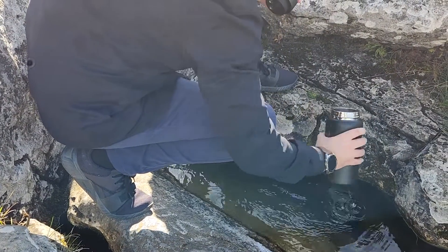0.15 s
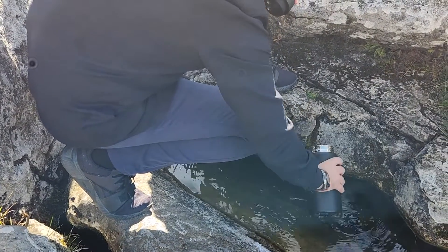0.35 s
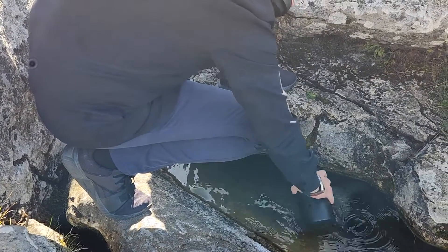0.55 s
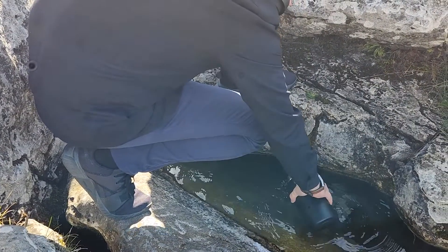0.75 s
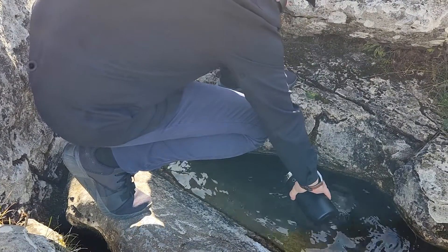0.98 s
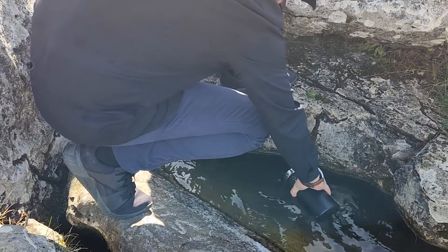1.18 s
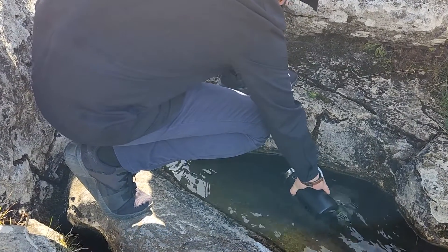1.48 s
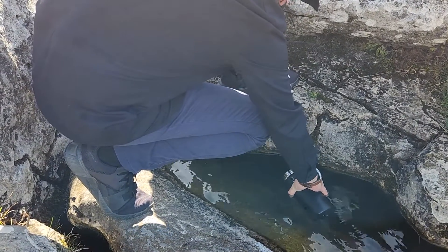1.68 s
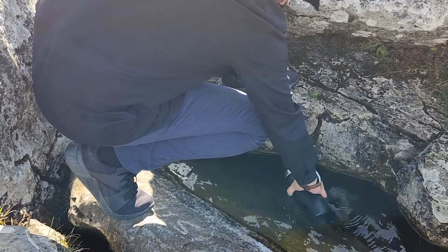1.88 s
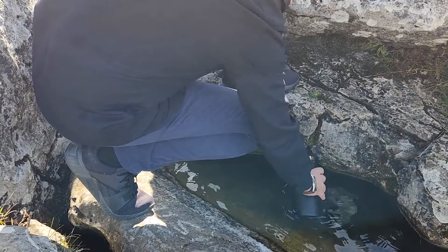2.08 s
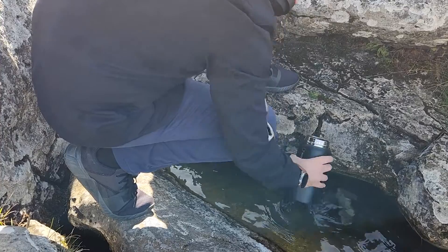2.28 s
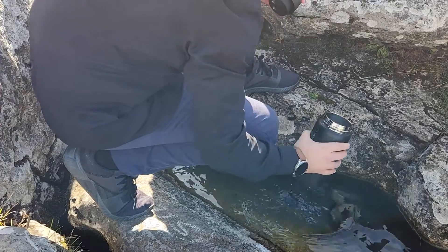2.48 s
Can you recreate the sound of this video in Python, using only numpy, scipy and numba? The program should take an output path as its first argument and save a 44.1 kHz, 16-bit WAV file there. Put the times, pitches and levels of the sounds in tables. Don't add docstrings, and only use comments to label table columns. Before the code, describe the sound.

Water plinks and bubbles as a steel bottle dips into a rock pool and lifts out dripping

```python
import sys
import numpy as np
from scipy import signal
from scipy.fft import rfft, irfft
from scipy.io import wavfile
from scipy.ndimage import uniform_filter1d
from numba import njit

SR = 44100
rng = np.random.default_rng(int(sys.argv[2]) if len(sys.argv) > 2 else 0)


def wav_out(sig):
    wavfile.write(sys.argv[1], SR, np.round(np.clip(np.atleast_2d(sig).T, -1, 1) * 32767).astype(np.int16))


def how_loud(loudness_db):
    steps = np.asarray(loudness_db, float) / 20
    return 10 ** steps


N = 116865


def level(x, db):
    return x * how_loud(db) / np.sqrt(np.mean(x ** 2))


def curve(rows, axis):
    rows = np.array(rows, float)
    return np.interp(np.arange(N) / SR, rows[:, 0], rows[:, axis])


def coloured(points):
    hz, db = np.array(points, float).T
    f = np.maximum(np.arange(N // 2 + 1) * SR / N, 1)
    gain = how_loud(np.interp(np.log(f), np.log(hz), db))
    in_band = (f >= hz[0]) * (f <= hz[-1])
    return irfft(rfft(rng.standard_normal(N)) * gain * in_band, N)


def walk(rate):
    hold = int(SR / rate)
    steps = np.repeat(rng.standard_normal(N // hold + 1), hold)
    return 0.82 * uniform_filter1d(uniform_filter1d(steps, hold), hold)[:N]


def wind():
    # (frequency [Hz], density [dB])
    wind_bands = [(20, -12.5), (64, 0.5), (150, -16), (400, -29), (730, -35), (1200, -42)]
    gusts = how_loud(2.4 * walk(2.2) + 1.0 * walk(14.42))
    return level(coloured(wind_bands), -52) * gusts


def leaves():
    # (frequency [Hz], density [dB])
    leaf_bands = [(1200, -6), (2400, -11), (3500, -2), (6800, 0), (7600, -8), (9800, -4), (10800, -18),
                  (15800, -25)]
    # (time [s], level [dB])
    breeze = [(0, -8), (.9, -2.5), (1.3, 0), (1.7, -8.5), (2.65, 4.5)]
    hiss = level(coloured(leaf_bands), -65) * how_loud(walk(12))
    top = signal.sosfiltfilt(signal.butter(1, 3500, "high", fs=SR, output="sos"), hiss)
    return hiss + (how_loud(curve(breeze, axis=1)) - 1) * top


def grass():
    # (frequency [Hz], density [dB])
    grass_bands = [(7500, -10), (11000, 13.5), (15800, 18)]
    # (time [s], level [dB])
    grass_level = [(0, -88), (.35, -76), (.55, -84), (2.65, -80)]
    return level(coloured(grass_bands), 0) * how_loud(curve(grass_level, axis=1) + walk(9))


@njit
def ring(rows, rise, share, choke, wobble, sr):
    n = len(wobble)
    out = np.zeros(n)
    for s, size, hz, t60, glide in rows:
        start, phase, tau = s * sr, 0., share * t60
        for i in range(int(start) + 1, min(n, int(start + t60 * sr))):
            t = (i - start) / sr
            shake = wobble[int(start + t * hz * 4) % n]
            octaves = glide * tau * (1 - np.exp(-t / tau))
            pitch = min(hz * 2 ** octaves, sr / 2.3)
            phase += shake ** .06 * 2 * np.pi * pitch / sr
            swell = (1 - np.exp(-t * hz / rise)) ** 2
            decay = 1000 ** -(t / t60) ** choke
            out[i] += size * shake * swell * decay * np.sin(phase)
    return out


def bubbles(rows, rise_cycles=0.83, wobble_db=5.5):
    glide_share = 0.327
    choke = 1.147
    rows = np.array(rows, float)
    rows[:, 1] = how_loud(rows[:, 1])
    rows[:, 3] = np.maximum(rows[:, 3], .002)
    roughness = how_loud(wobble_db * walk(2000))
    return ring(rows, rise_cycles, glide_share, choke, roughness, 1. * SR)


def earlier_drip():
    # (time [s], peak level [dB], pitch [Hz], ring t60 [s], glide [octaves/s])
    drip = [
        (0.0033, -64.5, 637, 0.47, 0.017),
    ]
    return bubbles(drip)


def dip_bubbles():
    # (time [s], peak level [dB], pitch [Hz], ring t60 [s], glide [octaves/s])
    dip_rows = [(0.2825, -44, 4350, 0.022, -7), (0.285, -48.5, 5050, 0.031, -8),
                (0.283, -46, 6850, 0.011, 4), (0.32, -50, 6700, 0.027, 9), (0.34, -53.5, 3180, 0.035, -9),
                (0.373, -58, 6730, .015, 3), (0.432, -47, 5740, 0.011, 1),
                (0.457, -26.5, 5120, 0.026, -0.5), (0.462, -28, 4920, 0.012, 14),
                (0.4672, -21.5, 1810, 0.014, -20), (0.471, -35.5, 1606, 0.063, -7),
                (0.473, -43, 1950, 0.045, 1), (0.487, -35.5, 1492, 0.028, -8),
                (0.534, -53.5, 1725, 0.09, 1), (0.488, -47, 4170, 0.017, 3), (0.587, -56, 2730, 0.14, -1),
                (0.588, -59, 3170, 0.12, -1.5), (0.586, -45, 966, 0.16, -6), (0.59, -61.5, 606, 0.14, -1),
                (0.629, -49, 4750, 0.038, -4), (0.633, -55.5, 1990, 0.17, -2),
                (0.716, -42, 1410, 0.042, 25), (0.718, -48, 4010, .04, -11), (0.721, -50, 1920, 0.077, 1),
                (0.796, -48.5, 3870, 0.032, 5), (0.852, -52, 1850, 0.076, 10), (0.735, -48, 1810, 0.072, 2),
                (0.773, -52.5, 1770, 0.068, 3), (0.797, -48.5, 1494, 0.088, -0.5),
                (0.836, -31, 1245, 0.057, 6.5), (0.838, -29.5, 1850, 0.021, -6),
                (0.836, -46.5, 2500, 0.042, -2), (0.86, -47.5, 1277, 0.16, 2.5),
                (0.996, -58, 1850, 0.033, -11), (1.918, -51, 6580, 0.07, -3)]
    return bubbles(dip_rows)


def splats(count=30):
    # (time [s], peak level [dB], size [octaves over 1 kHz], tail t60 [s])
    dip_drops = [(0.2817, -39.5, 2.63, .04), (0.322, -46.5, 2.78, 0.06), (0.347, -44.5, 3.6, 0.027),
                 (.457, -32, 2.71, 0.058), (0.466, -37, 1.73, 0.046), (.535, -31, 2.52, 0.05),
                 (0.66, -41, 2.06, 0.05), (0.717, -42.5, 1.76, 0.16), (0.796, -44, 2.58, 0.18),
                 (0.835, -41, 2.69, 0.054), (1.739, -54.5, 2.64, .04), (1.859, -52, 2.03, 0.05),
                 (1.918, -43.5, 3.18, 0.052), (1.973, -31, 2.27, 0.052), (2.03, -38.5, 1.57, 0.04),
                 (2.033, -33, 2.6, 0.14), (2.12, -49, 1.6, 0.023), (2.267, -54, 3, .02),
                 (0.2826, -37, 3.9, .015), (0.373, -52.5, 2.87, 0.031)]
    # (time [s], peak level [dB], size [octaves over 1 kHz])
    lift_drops = [(2.337, -43.5, 1.75), (2.354, -45, 2.92), (2.371, -34.5, 2.54), (2.418, -34, 2.71),
                  (2.447, -30.5, 2.33), (2.462, -34.5, 2.57), (2.488, -28, 2.3), (2.500, -25, 3),
                  (2.505, -28, 1.58), (2.516, -28.5, 2.6), (2.536, -28, 2.53), (2.554, -31.5, 3.06),
                  (2.567, -31, 2.7), (2.577, -32.5, 2.5), (2.591, -44, 4.5), (2.639, -49, 2.9)]
    lift_t60_s = .05
    spray_oct, spray_cycles, spray_db = 0.362, 14.5, -2
    mist_db, crack_db, crack_s = -3, -11, 0.00092
    out, spray, t = np.zeros(N), [], np.arange(SR // 5) / SR
    for s, db, octs, t60 in dip_drops + [(*row, lift_t60_s) for row in lift_drops]:
        hz, t60 = 1000 * 2 ** octs, max(t60, .004)
        chance, spread = rng.random((count, 2)), rng.standard_normal((count, 2))
        pitch = np.clip(hz * 2 ** (spray_oct * spread[:, 0]), 1200, 14500)
        late = t60 * .5 * chance[:, 0] ** 1.5
        spray_level = db + spray_db + 3 * spread[:, 1] - 60 * late / t60
        spray_t60 = spray_cycles * (1 + chance[:, 1]) / pitch
        spray += list(np.c_[s + late, spray_level, pitch, spray_t60, 0 * pitch])

        noise = rng.standard_normal(len(t))
        mist = noise * how_loud(mist_db - 60 * t / t60) * (1 - np.exp(-t / 0.0013))
        edges = np.clip([hz * 0.59, hz * 1.48], 300, 16000)
        mist = signal.sosfilt(signal.butter(3, edges, "band", fs=SR, output="sos"), mist)
        crack = noise * how_loud(crack_db) * np.exp(-t / crack_s)
        crack = signal.sosfilt(signal.butter(2, edges[0], "high", fs=SR, output="sos"), crack)
        i = int(s * SR)
        out[i:i + len(t)] += how_loud(db) * (mist + crack)[:N - i]
    return out + bubbles(spray)


def running_water(flow, count):
    centre_hz, spread_oct, ring_cycles, spread_db = 1902, 0.97, 12.5, 2.5
    fizz_tilt = 0.025
    chance, spread = rng.random(count), rng.standard_normal(count)
    excess = rng.exponential(size=count)
    s = flow[0][0] + chance * (flow[-1][0] - flow[0][0])
    db = np.interp(s, *np.array(flow).T)
    hz = np.clip(centre_hz * 2 ** (fizz_tilt * (db - db.mean()) + spread_oct * spread), 750, 14000)
    peak_db = db + spread_db * np.minimum(excess, 2)
    return bubbles(np.c_[s, peak_db, hz, ring_cycles / hz, 0 * s + 10])


def trickle():
    # (time [s], level [dB])
    inflow = [
        (.46, -61),
        (.92, -62),
    ]
    return running_water(inflow, count=250)


def pocket(rows):
    t = np.arange(N) / SR
    pitch = curve(rows, axis=1) * (1 + 0.0055 * walk(59.66))
    tone = np.sin(2 * np.pi * np.cumsum(pitch) / SR)
    sounding = uniform_filter1d(1. * (t > rows[0][0]) * (t < rows[-1][0]), size=150)
    return np.sqrt(2) * how_loud(curve(rows, axis=2) + 3.5 * walk(70)) * tone * sounding


def neck_pocket():
    # (time [s], pitch [Hz], level [dB])
    neck = [(.584, 1446, -70), (.589, 1414, -42.5), (.615, 1359, -42), (.715, 1342, -63)]
    return pocket(neck)


def slosh():
    # (frequency [Hz], width [Hz], level [dB])
    slosh_modes = [(850, 130, -11.5), (1150, 170, -12.5), (1439, 81, -13), (1850, 160, -14.5)]
    # (time [s], level [dB])
    slosh_level = [(1.96, -69.5), (2.0, -55.5), (2.18, -61), (2.3, -58), (2.65, -55)]
    murmur = np.zeros(N)
    for hz, width, db in slosh_modes:
        mode = signal.lfilter(*signal.iirpeak(hz, hz / width, fs=SR), rng.standard_normal(N))
        murmur += level(mode, db) * how_loud(2.2 * walk(24.87))
    return murmur * how_loud(curve(slosh_level, axis=1))


def belly_pocket():
    # (time [s], pitch [Hz], level [dB])
    belly = [(1.972, 423.7, -46), (1.98, 413.6, -42.5), (2.03, 382, -50), (2.1, 355.5, -53.5),
             (2.165, 385, -57.5), (2.18, 376, -62), (2.26, 443, -66.5)]
    return pocket(belly)


def gulps():
    # (time [s], level [dB])
    knocks = [
        (1.9723, -27.5),
        (2.028, -34.5),
    ]
    # (frequency [Hz], level [dB], t60 [s], glide [octaves/s])
    knock_modes = [
        [(657, 2, 0.095, 0.5), (980, -7, 0.13, -6), (1120, -19, 0.43, 1), (1410, 4.5, 0.042, 6.5),
         (1594, -18, .15, -1), (2564, -10, 0.049, -1.5), (2956, -6, 0.021, -6)],
        [(616, -3.5, 0.13, -0.78), (818, -17, 0.23, 0.047), (985, -2, 0.069, 0), (1156, -3, 0.13, -1.74),
         (1304, -1, 0.075, -1.4), (1563, -8.5, 0.13, 0.092), (1850, -2.5, 0.04, 0)],
    ]
    rows = []
    for (s, db), modes in zip(knocks, knock_modes):
        rows += [(s, db + mode_db, hz, t60, glide) for hz, mode_db, t60, glide in modes]
    return bubbles(rows, rise_cycles=1.46, wobble_db=1.6)


def streaming():
    # (time [s], level [dB])
    outflow = [(2.31, -69), (2.36, -50), (2.44, -47.5), (2.5, -43.5), (2.58, -52), (2.6, -72)]
    return running_water(outflow, count=600)


def lift_bubbles():
    # (time [s], peak level [dB], pitch [Hz], ring t60 [s], glide [octaves/s])
    lift_rows = [(2.343, -32.5, 3010, 0.035, 3), (2.346, -38, 3270, 0.028, 1),
                 (2.343, -37, 1380, 0.021, 21), (2.352, -49.5, 830, 0.085, 6),
                 (2.357, -38.5, 8440, 0.023, 10), (2.372, -32.5, 638, 0.072, 1.2),
                 (2.377, -35, 4930, 0.017, -9), (2.399, -41.5, 1453, 0.038, -5),
                 (2.419, -34, 4730, 0.022, -12), (2.422, -33.5, 578, 0.076, -9),
                 (2.446, -18, 524, 0.017, 24), (2.447, -35, 907, 0.059, -15.5),
                 (2.446, -30, 3970, 0.021, -2), (2.464, -38.5, 1630, 0.048, 0),
                 (2.475, -25, 3430, 0.025, -1), (2.489, -37, 1850, 0.024, 22),
                 (2.498, -26.5, 1553, 0.034, -5.5), (2.537, -28.5, 2820, 0.048, -8.5),
                 (2.5394, -34, 1222, 0.047, 3.5), (2.561, -27.5, 2655, 0.042, 10.5),
                 (2.573, -40.5, 3220, 0.054, -1), (2.371, -40, 6240, .015, -4),
                 (2.358, -45, 5850, 0.023, 2), (2.397, -53, 3680, 0.034, 5), (2.419, -39, 1746, .04, 0),
                 (2.453, -33, 3720, 0.017, 3), (2.461, -31.5, 1550, 0.017, 10),
                 (2.462, -42, 5800, 0.013, -4), (2.502, -30.5, 1486, 0.024, 17),
                 (2.505, -30, 2260, 0.0092, -2), (2.511, -32, 1433, 0.023, -21),
                 (2.516, -40, 2940, 0.018, -1), (2.52, -61, 1370, 0.016, 0), (2.52, -30, 5540, 0.017, 8),
                 (2.523, -32, 6400, 0.018, -5), (2.556, -33, 6750, 0.019, -12),
                 (2.557, -31.5, 3570, 0.028, -19), (2.569, -29.5, 6340, 0.025, 11.5),
                 (2.581, -37, 4250, 0.019, 0), (2.581, -48.5, 1820, 0.052, -1)]
    return bubbles(lift_rows)


def gurgle():
    # (time [s], pitch [Hz], level [dB])
    mouth = [(2.462, 622.6, -36), (2.47, 660, -38), (2.49, 664, -43.5), (2.496, 785, -44),
             (2.517, 1007, -43.5)]
    return pocket(mouth)


def rock_echo(water):
    t = np.arange(SR // 5) / SR
    t60_s, tail_db = 0.16, -12.5
    tail = rng.standard_normal(len(t)) * how_loud(-60 * t / t60_s) * (t > .002)
    tail = level(tail, 0) / np.sqrt(len(t))
    return how_loud(tail_db) * signal.fftconvolve(water, tail)[:N]


def scene():
    air = wind() + leaves() + grass()
    water = earlier_drip() + dip_bubbles() + splats() + trickle() + neck_pocket()
    water += slosh() + belly_pocket() + gulps()
    water += streaming() + lift_bubbles() + gurgle()
    water = signal.sosfilt(signal.butter(2, 12300, fs=SR, output="sos"), water)
    return (water + rock_echo(water) + air)[None]


def roll_off(x):
    return signal.sosfilt(signal.butter(12, 16630, fs=SR, output="sos"), x)


def record(dry):
    mix = signal.sosfilt(signal.ellip(8, .2, 60, 15900, fs=SR, output="sos"), dry)
    return roll_off(mix)


dry = scene()
out = record(dry)
wav_out(out)
```